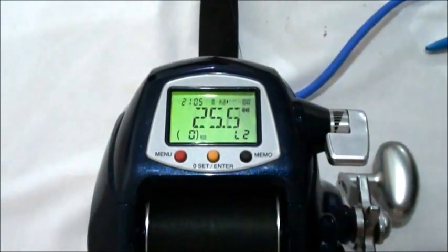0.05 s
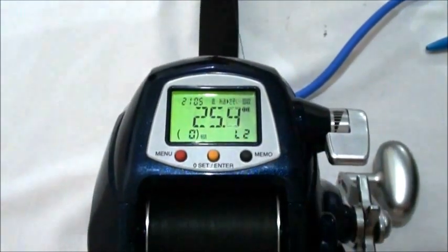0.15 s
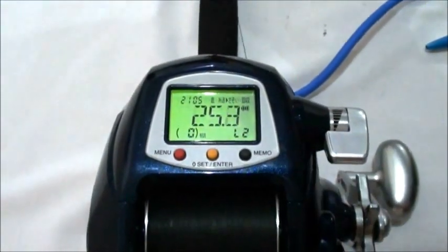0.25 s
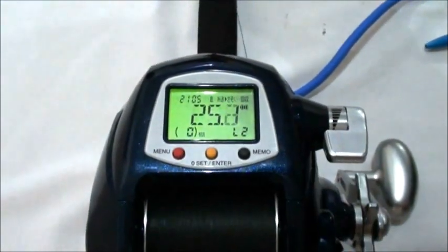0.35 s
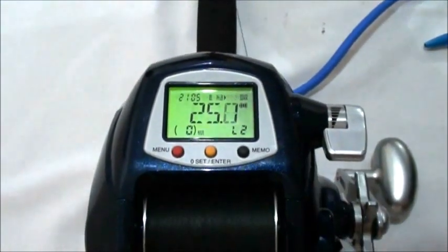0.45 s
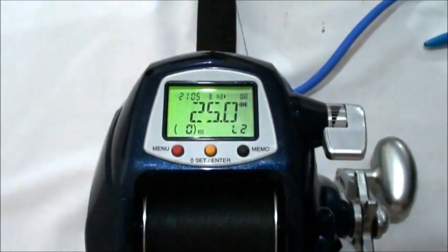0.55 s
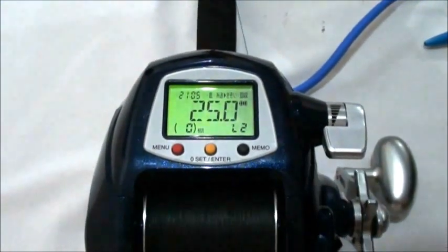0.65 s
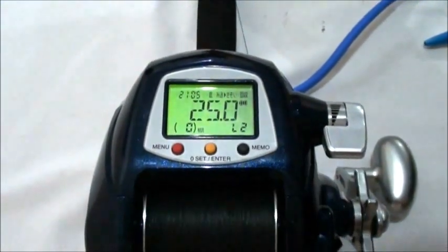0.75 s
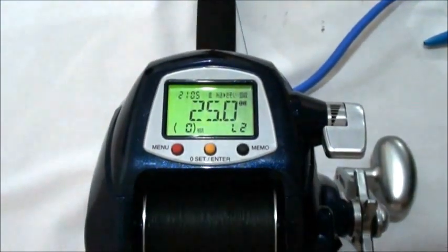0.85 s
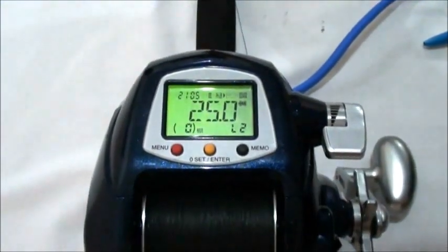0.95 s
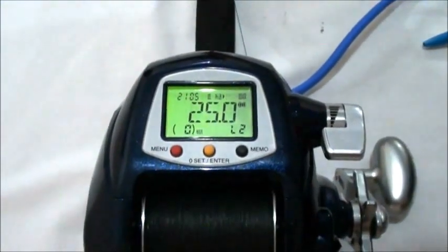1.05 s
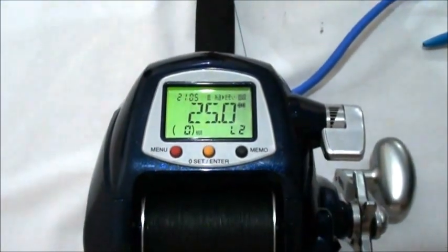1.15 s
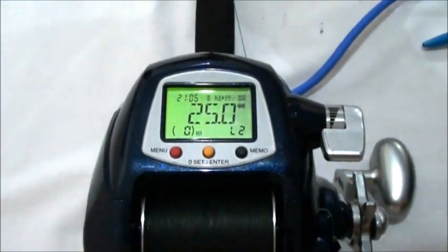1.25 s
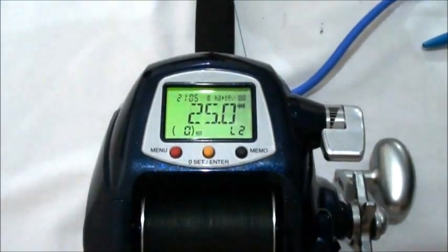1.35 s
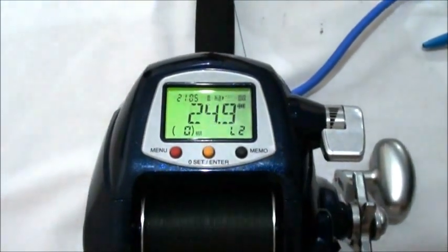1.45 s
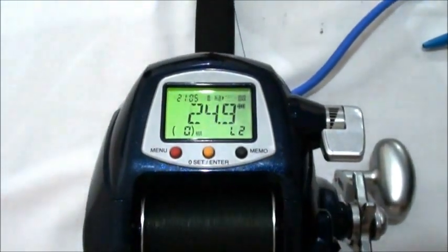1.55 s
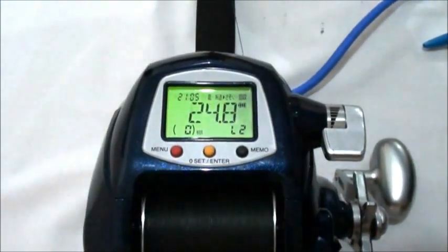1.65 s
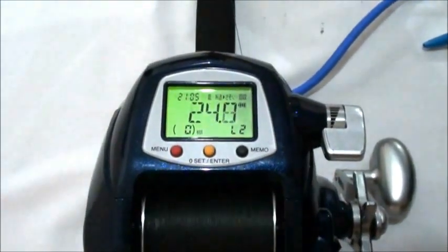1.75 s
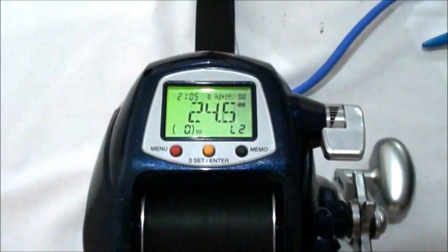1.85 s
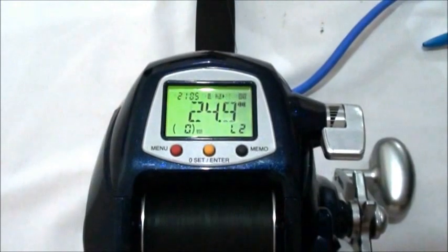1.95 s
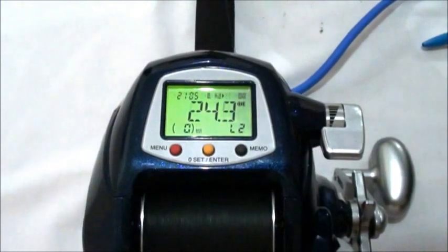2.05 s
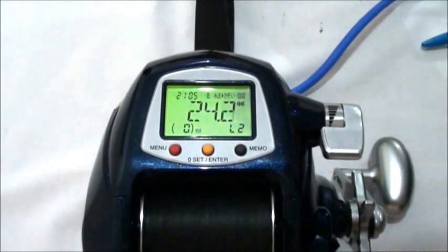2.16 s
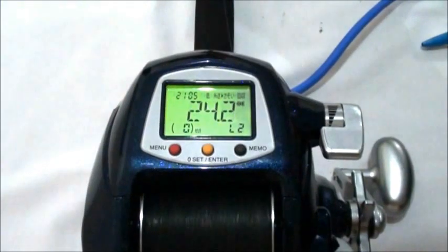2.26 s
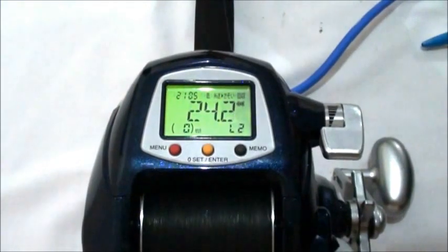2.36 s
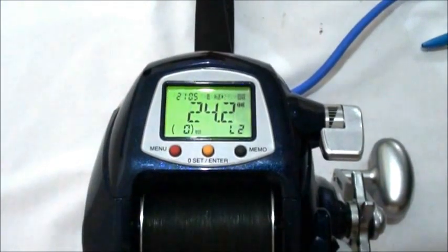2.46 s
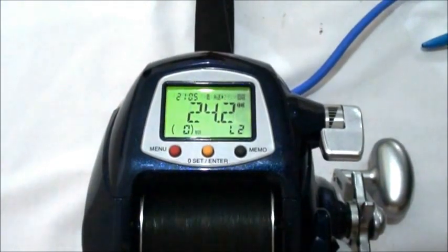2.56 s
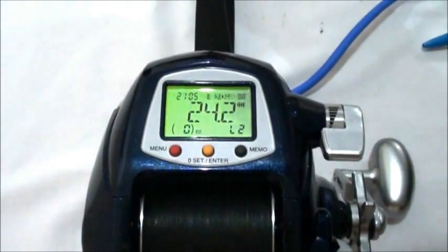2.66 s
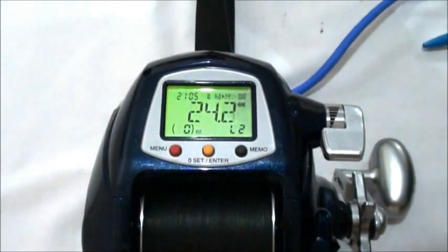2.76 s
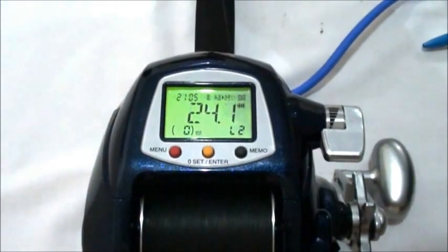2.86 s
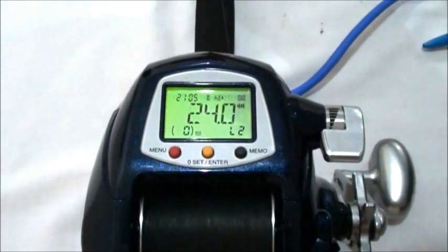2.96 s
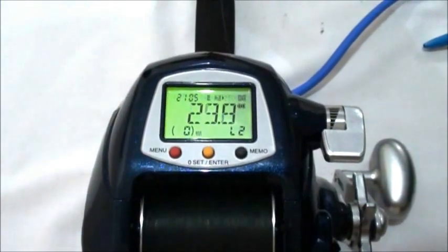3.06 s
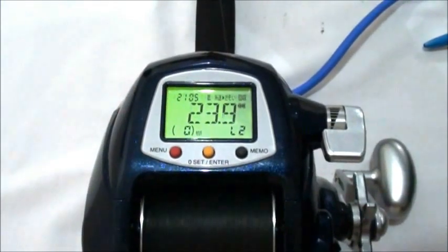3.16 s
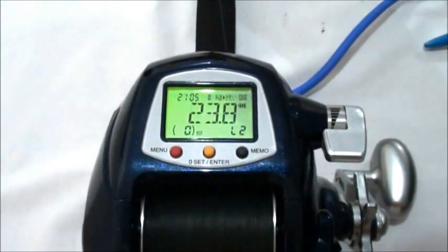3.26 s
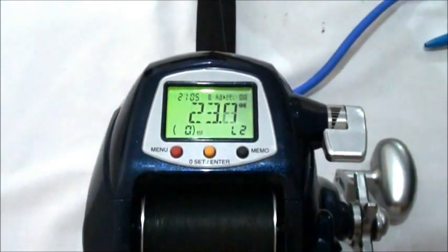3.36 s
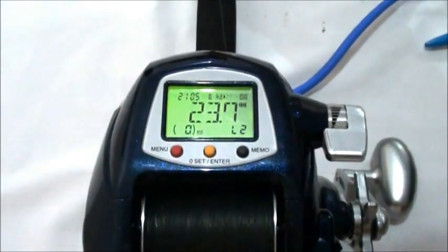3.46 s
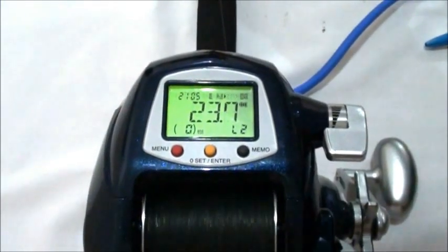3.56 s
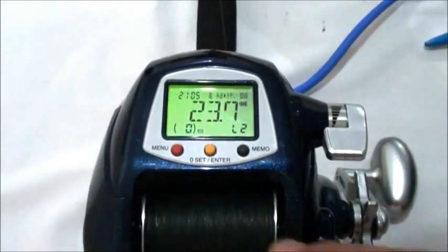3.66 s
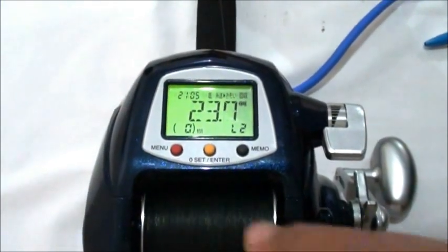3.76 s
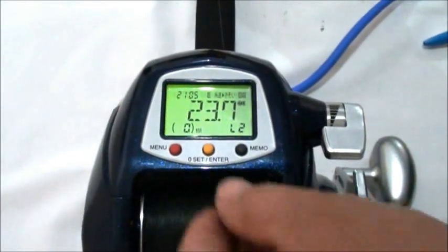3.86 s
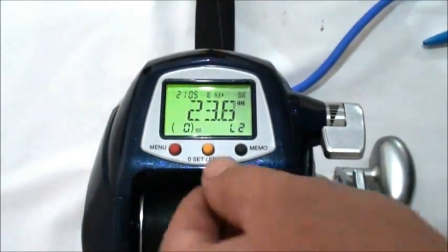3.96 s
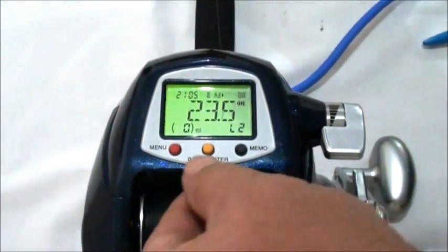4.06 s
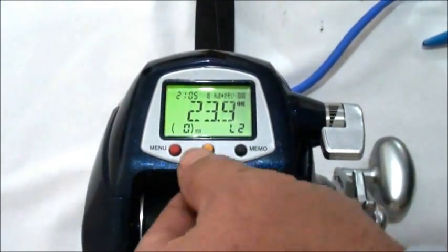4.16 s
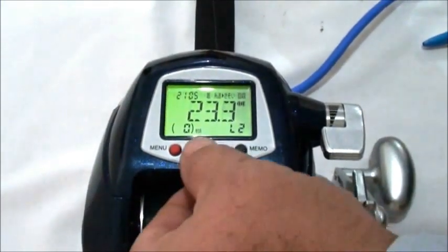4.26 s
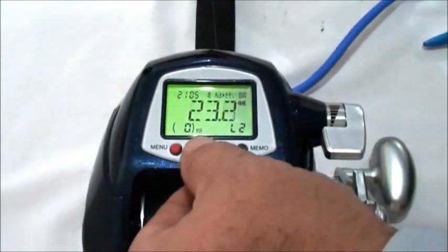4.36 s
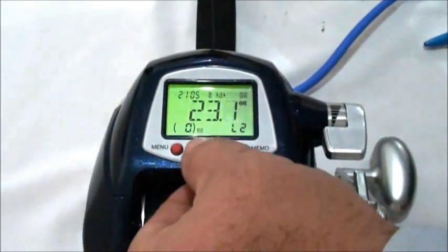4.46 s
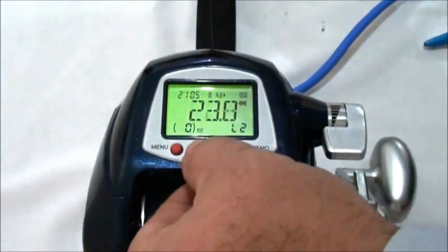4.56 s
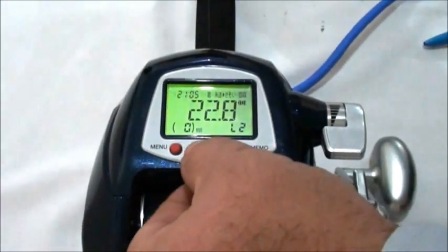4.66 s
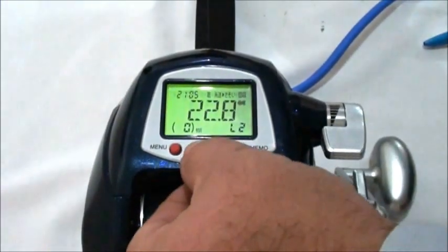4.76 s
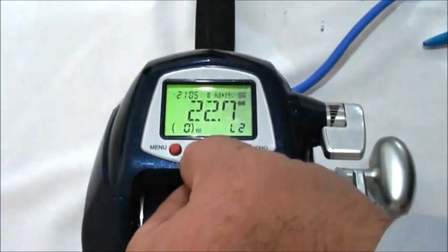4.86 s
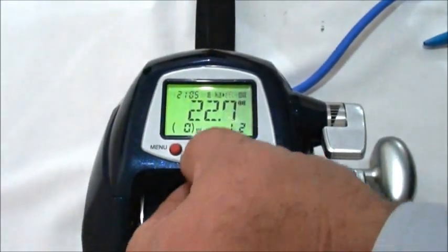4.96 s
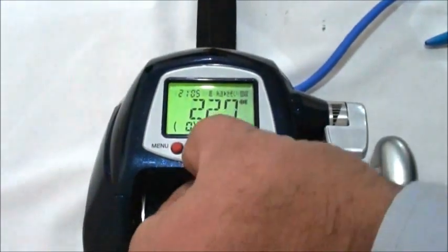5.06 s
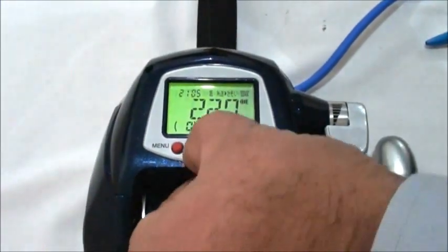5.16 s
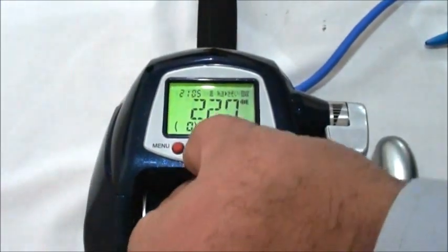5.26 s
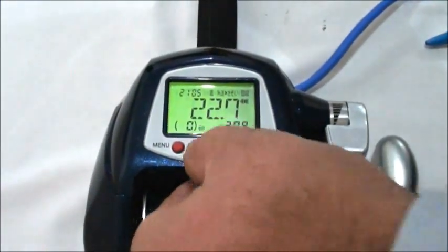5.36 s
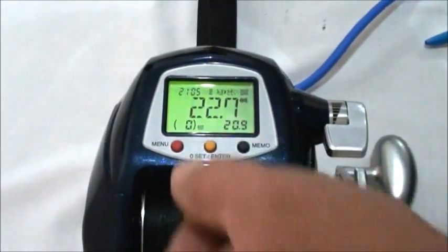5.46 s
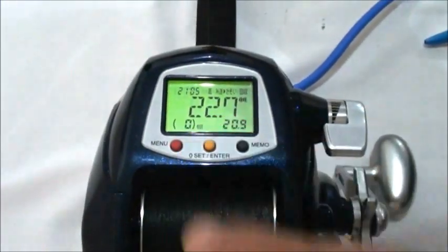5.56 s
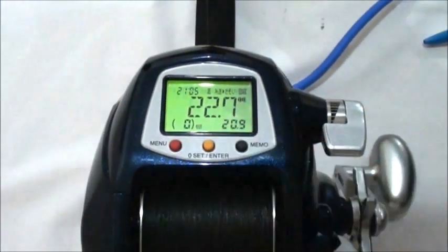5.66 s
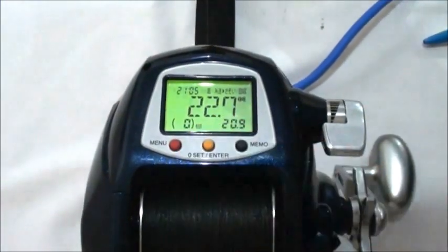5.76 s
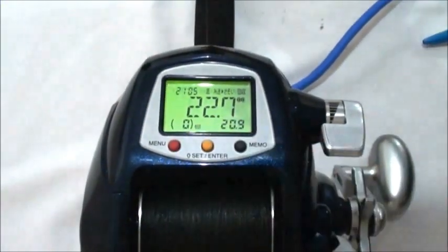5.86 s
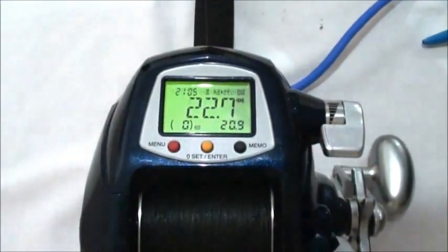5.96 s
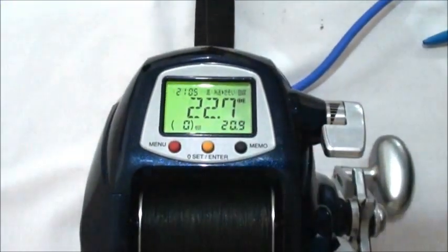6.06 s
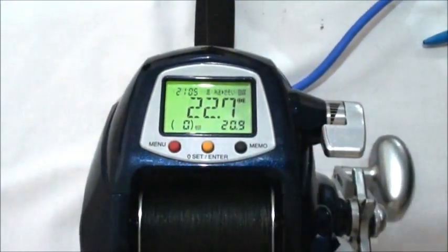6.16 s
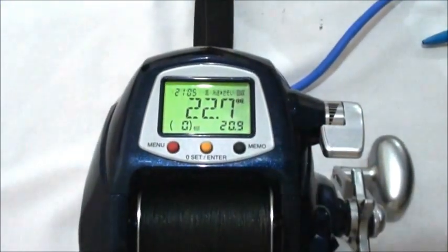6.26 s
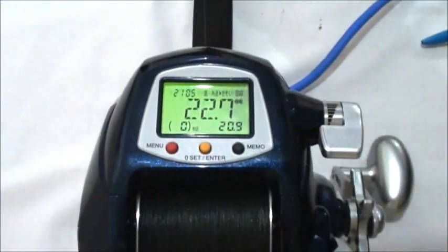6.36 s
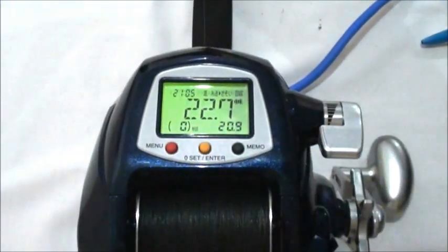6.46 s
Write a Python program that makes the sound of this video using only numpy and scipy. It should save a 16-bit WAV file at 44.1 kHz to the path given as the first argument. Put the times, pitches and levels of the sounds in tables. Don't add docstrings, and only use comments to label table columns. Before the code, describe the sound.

A small geared electric motor whirs in four bursts, rising and winding down with rattling clicks, over a steady low hum in a quiet room.

```python
import sys
import numpy as np
from scipy import signal
from scipy.fft import rfft, irfft
from scipy.io import wavfile
from scipy.ndimage import uniform_filter1d, minimum_filter1d

SR = 44100
rng = np.random.default_rng(int(sys.argv[2]) if len(sys.argv) > 2 else 0)


def generate_wav(signal):
    frames = np.transpose(np.atleast_2d(signal))
    scaled = np.clip(frames, -1, 1) * 32767
    pcm = np.round(scaled).astype(np.int16)
    wavfile.write(sys.argv[1], SR, pcm)


def elevation(decibels):
    levels = np.asarray(decibels, float)
    return 10 ** (levels / 20)


N = 286650
TIME = np.arange(N) / SR
SIZE = 16384
FREQ = np.arange(SIZE // 2 + 1) * SR / SIZE


def unit(x):
    return x / np.sqrt(np.mean(x ** 2))


def shape(x, gain):
    cep = irfft(np.log(gain + 1e-9), SIZE)
    cep[1:SIZE // 2] *= 2
    cep[SIZE // 2 + 1:] = 0
    response = irfft(np.exp(rfft(cep)), SIZE)
    return signal.fftconvolve(np.atleast_2d(x), response[None], axes=1)[:, :N].reshape(np.shape(x))


def colour(points):
    hz, db = np.transpose(points)
    return elevation(np.interp(np.log(FREQ + 1), np.log(hz), db))


def peak(hz, width_hz):
    return 1 / (1 + ((FREQ - hz) / (width_hz / 2)) ** 2)


def walk(rate):
    steps = rng.standard_normal(int(8 * rate * N / SR) + 9)
    steps = uniform_filter1d(uniform_filter1d(steps, size=8), size=8)
    return np.interp(np.linspace(0, len(steps) - 1, N), np.arange(len(steps)), unit(steps))


def law(table, speed):
    hz, *columns = np.transpose(table)
    return np.array([np.interp(speed, hz, c) for c in columns])


def through(path, bed_db, hz):
    power = sum(elevation(db) ** 2 / (1 + ((hz - f) / (w / 2)) ** 2) ** 2 for f, w, db in path)
    return np.sqrt(elevation(bed_db) ** 2 + power)


# [f/Hz, level/dB per Hz]
AIR_COLOUR = [(20, -23), (50, -17), (90, -17.5), (160, -4), (240, -8.5), (400, -13.5), (750, -16),
              (2000, -24), (4800, -25), (16000, -29)]
# [f/Hz, level/dB]
AIR_SIDE = [(60, -22), (200, -16), (400, -5.5), (800, -1.5), (2400, -1.5), (4400, -5.5), (8000, -7),
            (15000, -21)]
# pitch [f/Hz], its drift [Hz/s], loudness [level/dB]
HUM_HZ = [194.02, 199.79]
HUM_DRIFT = [-0.025, 0.025]
HUM_LEVEL = [-52.5, -53.5]


def room():
    air_db, crest_s = -47.5, 5.753
    mid, side = rng.standard_normal((2, N))
    difference = shape(side, colour(AIR_SIDE)) * np.array([[1], [-1]])
    air = shape(mid * elevation(1.0 * walk(3.77)) + difference, colour(AIR_COLOUR))
    since = TIME - crest_s
    hums = sum(elevation(db) * np.sqrt(2) * np.sin(2 * np.pi * (hz + drift * since / 2) * since)
               for hz, drift, db in zip(HUM_HZ, HUM_DRIFT, HUM_LEVEL))
    return unit(air) * elevation(air_db) + hums * elevation(walk(10))


def walls(x):
    t60_s, level_db = 0.58, -6.5
    t = np.arange(SR // 2) / SR
    decay = np.exp(-np.log(1000) * t / t60_s) * (t > .003)
    mid, side = rng.standard_normal((2, len(t))) * decay
    tail = (mid + 0.25 * side * np.array([[1], [-1]])) / np.sqrt(np.sum(mid ** 2))
    dull = shape(x, colour([(80, -14), (400, -2), (1200, 0), (2830, -6), (8000, -26)]))
    return elevation(level_db) * signal.fftconvolve(dull[None], tail, axes=1)[:, :N]


# [f/Hz, level/dB]
NEAR_DIFFERENCE = [(60, -29), (200, -25), (700, -12.5), (2400, -16.5), (5000, -16.5), (7500, -20),
                   (9000, -45), (15000, -35.5)]


def nearby(x):
    turn_rad = -1.8
    response = np.roll(irfft(colour(NEAR_DIFFERENCE) * np.exp(1j * turn_rad), SIZE), SIZE // 2)
    return signal.fftconvolve(x, response)[SIZE // 2:SIZE // 2 + N] * np.array([[1], [-1]])


# [t/s, level/dB, rise/dB per s, fall/dB per s]
STROKES = [
    (5.94, -47.5, 26, 45),
    (6.274, -52.5, 130, 95),
    (6.43, -51, 80, 120),
]


def sleeve():
    grains = rng.standard_normal(N) * elevation(1.1 * walk(55) + 1.2 * walk(700))
    cloth = colour([(300, -9), (1500, -5.5), (4500, -6.5), (8500, -10.0), (12000, -20.0)])
    strokes = sum(elevation(db - np.maximum(rise * (s - TIME), fall * (TIME - s))) for s, db, rise, fall in STROKES)
    return unit(shape(grains, cloth)) * strokes


# [t/s, level/dB]
THUMPS = [
    (5.511, -48),
    (6.233, -30.5),
    (6.44, -60),
]
THUMP_DRONE = [-45.5, -43.5, -48]


def shaking():
    speed, coast, running, settings = drive()
    drone_db = settings[4]
    free = np.minimum(coast, 1)
    driven = through([(55.6, 19, 0)], -18, speed) * elevation(drone_db - np.clip(speed - 190, 0, None) * 0.14)
    coasting = through([(96, 43, -46)], -48, speed)
    force = running * ((1 - free) * driven + free * coasting)
    keep = np.exp(-np.log(1000) / (0.3 * SR))
    after = sum(elevation(db) * (TIME > s) * keep ** (0.4 * SR * np.clip(TIME - s, 0, None))
                for (s, _), db in zip(THUMPS, THUMP_DRONE))
    ringing = signal.lfilter([1 - keep], [1, -keep], force) + uniform_filter1d(after, size=900)
    return ringing * elevation(walk(7))


def table():
    mode_hz, width_hz = 115, 8
    wobble = 2 * np.pi * np.cumsum(mode_hz + 3.66 * walk(13.9)) / SR
    wood = colour([(20, -18), (60, -10), (118, 1.5), (260, -5), (420, -30), (900, -27)])
    shudder = unit(shape(rng.standard_normal(N), wood))
    drone = shaking() * (np.sqrt(2) * np.sin(wobble) + elevation(-8) * shudder)
    push = sum(elevation(db) * np.exp(-((TIME - s) / 0.00056) ** 2) for s, db in THUMPS)
    ring = shape(push, np.sqrt(peak(mode_hz, width_hz) + 0.15 * peak(280, 160)))
    return drone + push - uniform_filter1d(push, size=500) + elevation(8) * ring


def hand(x):
    start_s, end_s, shade_hz, shade_db = 4.25, 5.45, 8600, -3.5
    over = uniform_filter1d(1. * (TIME > start_s) * (TIME < end_s), size=9000)
    shaded = shape(x, colour([(shade_hz, 0), (shade_hz * 0.89, shade_db)]))
    return x + over * (shaded - x)


# [t/s, level/dB]
SLACK_TAKEN = [
    (1.3024, -14),
    (2.6987, -18),
    (3.9003, -24),
]


def clutch():
    mode_hz, t60_s = 2710, 0.026
    out = np.zeros(N)
    for s, db in SLACK_TAKEN:
        t = np.clip(TIME - s, 0, None)
        out += elevation(db) * np.exp(-np.log(1000) * t / t60_s) * np.sin(2 * np.pi * mode_hz * t)
    return out


# [f/Hz, width/Hz, level/dB]
SHELL_MODES = [(608, 72, -13), (989, 48, -9.5), (1144, 29, -10), (1464, 185, -6.5), (1575, 116, -11),
               (1860, 130, -7.5), (2518, 110, -3), (2880, 190, -3.5), (3800, 130, -11.5), (5277, 165, -0.5),
               (6140, 360, -1), (6884, 430, 3.5), (7480, 290, -3.5), (8430, 270, -4), (9480, 330, -3),
               (9980, 296, 2.5), (13800, 1600, -17)]
# [f/Hz, level/dB]
SHELL_BED = [(30, -81), (90, -37), (180, -13), (300, -35.5), (800, -12), (2150, -13), (4400, -14),
             (9000, -6), (11000, -16), (12000, -42), (16000, -46.5)]


def housing():
    whole = np.sqrt(colour(SHELL_BED) ** 2 + sum(elevation(db) ** 2 * peak(hz, w) for hz, w, db in SHELL_MODES))
    whole *= (FREQ / 110) ** 2 / np.sqrt(1 + (FREQ / 110) ** 4)
    dull = 1 / np.sqrt(1 + (FREQ / 4200) ** 12)
    return whole, whole * dull, whole * np.sqrt(1 - dull ** 2)


# [t/s, peak level/dB]
LONE_KNOCKS = [(0.8125, -12), (0.853, -19.5), (1.3023, -29), (1.3129, -18), (1.3204, -13), (1.3302, 2),
               (2.485, -31), (2.6988, -9), (3.6037, -20), (3.6514, -32), (3.8995, -17.5), (3.906, -19),
               (3.916, 0.5), (3.9298, -6), (3.9359, -2), (3.949, -7), (5.0734, -26), (5.078, -25)]
# [first t/s, last t/s, first level/dB, last level/dB]
KNOCK_RUNS = [
    (0.7943, 0.828, -21, -11),
    (1.3472, 1.4045, 0.5, -1),
    (2.4286, 2.4663, -17, -21.5),
    (2.7169, 2.802, 0, -4),
    (3.61, 3.6334, -13, -22.5),
    (5.034, 5.0494, -18.5, -17.5),
]


def knocks():
    rate_hz, slip_s, scatter_db = 107, 0.0008, 0.5
    rows = [np.array(LONE_KNOCKS)]
    for first, last, first_db, last_db in KNOCK_RUNS:
        place = np.linspace(0, 1, round((last - first) * rate_hz) + 1)
        slip, scatter = rng.standard_normal((len(place), 2)).T
        times = first + place * (last - first) + slip_s * slip * (place > 0)
        levels = first_db + place * (last_db - first_db) + scatter_db * scatter
        rows.append(np.transpose([times, levels]))
    return np.concatenate(rows)


def pawl():
    whole, dull, bright = housing()
    t = np.arange(800) / SR
    click_fade = (1 - np.exp(-t / .001)) * (np.exp(-t / .0016) + .1 * np.exp(-t / .007))
    thud_fade = (1 - np.exp(-t / .0009)) * np.exp(-t / .004)
    clicks, thuds = np.zeros((2, N))
    for s, db in knocks():
        i = int(s * SR)
        chatter = rng.standard_normal((2, len(t)))
        chatter = chatter / np.sqrt(uniform_filter1d(chatter ** 2, size=90))
        clicks[i:i + len(t)] += elevation(db) * chatter[0] * click_fade
        thuds[i:i + len(t)] += elevation(-16 + 0.74 * db) * chatter[1] * thud_fade
    click_gain = unit(bright * colour([(10000, 2.5), (13000, 4.5)]))
    return elevation(-1.5) * shape(clicks, click_gain) + elevation(5.0) * shape(thuds, unit(dull))


# [t/s, turns f/Hz]
ROTOR_SPEED = [
    [(0.0, 314.5), (0.088, 327.5), (0.304, 334.5), (0.366, 305), (0.462, 243.5), (0.586, 172.5),
     (0.75, 90.6), (0.87, 30)],
    [(1.301, 46), (1.46, 60), (1.702, 147.4), (1.804, 209.3), (1.9, 246), (2.105, 285), (2.144, 272),
     (2.32, 158.7), (2.5, 45)],
    [(2.699, 45), (2.87, 60), (3.092, 153.4), (3.16, 177), (3.268, 193.5), (3.325, 188.5), (3.394, 160.5),
     (3.53, 105.3), (3.67, 39)],
    [(3.899, 36), (4.0, 66), (4.23, 201), (4.312, 239), (4.406, 260.4), (4.572, 280.6), (4.714, 287),
     (4.836, 208), (5.1, 49)],
]
# [slack rattles until t/s, its rumble level/dB, effort level/dB, supply whistle level/dB,
# table drone level/dB]
BURST_LEVELS = [
    (0.01, -32, -0.5, -36, -35),
    (1.41, -31, 1.5, -29.5, -31.5),
    (2.81, -30, 2.5, -30, -25.5),
    (3.956, -27.5, 1, -27, -22.5),
]
# [gears sound faster by f/Hz when driven, by f/Hz when coasting,
# whine level/dB, brushes level/dB]
LINE_PULL = [(7, 3.5, 0.5, 1), (2, -25, 0, 0), (9.5, 6, 2.5, 0.5), (39, -29, 1, 0)]
CASE_RUMBLE = [0.5, -2, -4.5, -1.5]


def drive():
    let_go_s, after_stop_db_s = 0.05, -300
    speed = uniform_filter1d(np.interp(TIME, *np.transpose(sum(ROTOR_SPEED, []))), size=1200)
    on, off = np.array([(rows[0][0], rows[-1][0]) for rows in ROTOR_SPEED]).T
    top = np.array([max(rows, key=lambda row: row[1])[0] for rows in ROTOR_SPEED])
    which = np.clip(np.searchsorted(on, TIME, side="right") - 1, 0, None)
    coast = np.clip((TIME - top[which]) / let_go_s, 0, None)
    running = elevation(after_stop_db_s * np.clip(TIME - off[which], 0, None))
    speed = np.where(TIME > off[which], np.minimum(speed, 45), speed)
    return speed, coast, running, np.column_stack([BURST_LEVELS, LINE_PULL, CASE_RUMBLE])[which].T


# [multiple of rotor speed, level/dB]
ORDERS = [(3, -1), (4, 3), (5, 7), (7, 5), (9, -2), (10, -3), (11, -1), (12, -3), (13, 5), (14, 4),
          (15, -8), (16, 1), (17, 0), (18, -6), (19, 2), (20, -5), (21, -4), (22, -6), (23, -6), (24, -7),
          (25, -7), (26, -7), (27, -1), (28, 5)]


def rotor_orders(turn, speed, free):
    orders = np.zeros(N)
    for k, db in ORDERS:
        level = elevation(db - 0.45 * k * free + 1.8 * walk(14))
        mesh = np.clip(speed / 175, 0, 1) ** (k / 4)
        slip = .4 * walk(15) + .002 * k * k * free * walk(60)
        orders += level * mesh * np.sin(k * turn + slip)
    unbalance = np.clip(speed / 258, 0, 1) ** 2.2
    return orders + elevation(16.5 + 2.7 * walk(14)) * unbalance * np.sin(turn)


# [f/Hz, width/Hz, level/dB]
MAGNET_MODES = [(410, 70, -35.5), (500, 67, -30.5), (576, 58, -25), (638, 70, -28.5)]
SIXTH_MODES = [(1140, 160, -29), (1590, 170, -18), (1830, 60, -24)]
EIGHTH_MODES = [(1150, 200, -28), (1520, 150, -18), (1900, 200, -18), (2280, 120, -29), (2580, 260, -22)]


def brushes(turn, speed):
    out = elevation(1.8 * walk(16)) * through(MAGNET_MODES, -45, 2 * speed) * np.sin(2 * turn)
    for k, path in [(6, SIXTH_MODES), (8, EIGHTH_MODES)]:
        out += elevation(1.4 * walk(20)) * through(path, -40.5, k * speed) * np.sin(k * turn)
    return out * np.clip(speed / 110, 0, 1) ** 2


def supply_whistle(turn):
    chop = 2 * np.pi * 10037 * TIME
    above = elevation(3) * np.sin(chop + 2 * turn)
    below = elevation(-5) * np.sin(chop - 2 * turn)
    return above + below + elevation(-14) * np.sin(chop)


# [turns f/Hz, gear hiss level/dB, case rumble level/dB, whine level/dB]
DRIVEN_LEVELS = [(40, -25, -38, -33), (56.6, -43.5, -35.5, -28), (129.6, -19, -21, -21.5),
                 (180, -16, -17.5, -34.5), (270, -15.5, -20.5, -24.5), (340, -13.5, -20.5, -23.5)]
COASTING_LEVELS = [(35, -52, -50, -29), (75.7, -41, -37.5, -28), (119.3, -25, -23, -25.5),
                   (178, -18.5, -19.5, -28), (250, -15.5, -20, -22.5), (330, -13.5, -22.5, -16)]


def motor():
    whole, dull, bright = housing()
    speed, coast, running, settings = drive()
    slack_s, slack_db, effort_db, whistle_db, _, pull, drag, whine_db, brush_db, rumble_db = settings
    turn = 2 * np.pi * np.cumsum(speed * (1 + .002 * walk(30))) / SR
    free = np.minimum(coast, 1)
    driven, coasting = law(DRIVEN_LEVELS, speed + pull), law(COASTING_LEVELS, speed + drag)
    hiss, rumble, whine = running * elevation(effort_db + (1 - free) * driven + free * coasting)
    slack = uniform_filter1d((TIME < slack_s) * elevation(slack_db), size=400)
    rumble = rumble * elevation(rumble_db) + slack

    teeth = rng.standard_normal(N) * (1 + 0.17 * np.cos(2 * turn)) * elevation(0.52 * walk(76.7) + 0.32 * walk(1100))
    gears = shape(rumble * teeth, unit(dull)) + shape(hiss * teeth, unit(bright))
    path = whole ** 1.71 / np.sqrt(1 + (FREQ / 5900) ** 10)
    orders = rotor_orders(turn, speed, free)
    tones = shape(whine * elevation(whine_db) * orders, path) / np.std(shape(orders, path))
    contacts = elevation(1.0) * running * elevation(brush_db) * brushes(turn, speed)

    whistle_level = running ** 2 * elevation(whistle_db - 88 * 0.05 * coast + 0.73 * walk(25.1))
    whistle = shape(supply_whistle(turn) * whistle_level, np.sqrt(peak(9740, 490)))
    return gears + tones + contacts + whistle


def scene():
    near = hand(motor() + pawl() + clutch()) + sleeve()
    top = table()
    return near + nearby(near + elevation(-0.5) * top) + walls(near) + top + room()


def band_limit(x):
    return signal.sosfilt(signal.butter(12, 16520, fs=SR, output="sos"), x)


def record(dry):
    room_left = np.minimum(1, .97 / (np.max(np.abs(dry), axis=0) + 1e-9))
    limited = dry * uniform_filter1d(minimum_filter1d(room_left, size=129), size=129)
    top_hz = 15850
    top_cut = colour([(20, 0), (top_hz, 0), (top_hz + 120, -26), (16500, -28), (17000, -60)])
    mix = shape(limited, top_cut)
    return band_limit(mix)


dry = scene()
out = record(dry)
generate_wav(out)
```